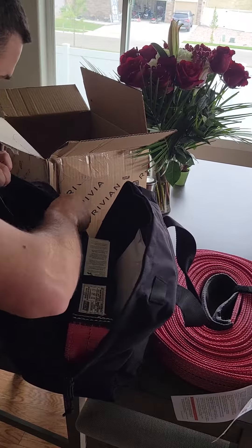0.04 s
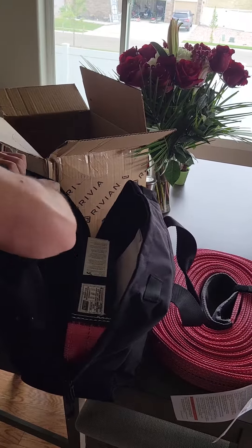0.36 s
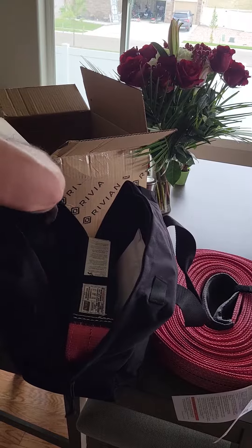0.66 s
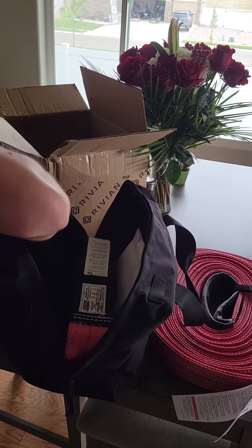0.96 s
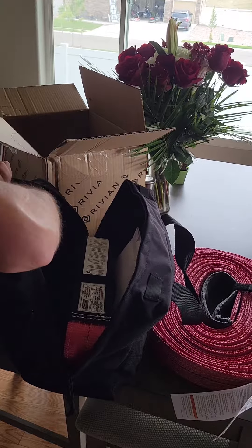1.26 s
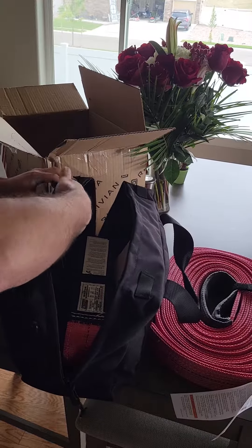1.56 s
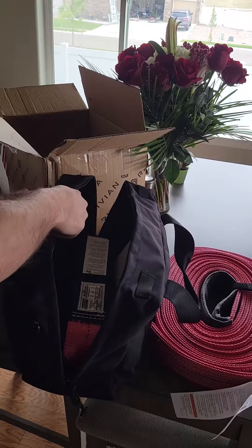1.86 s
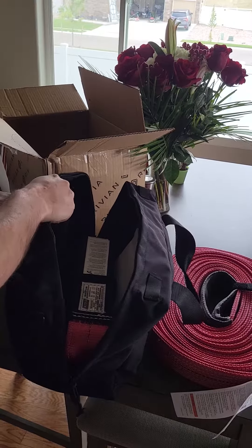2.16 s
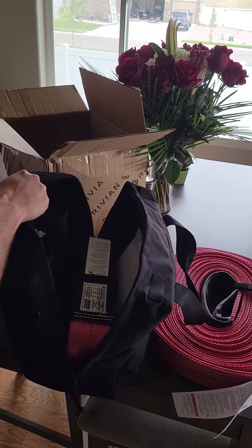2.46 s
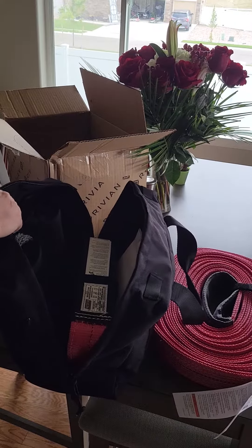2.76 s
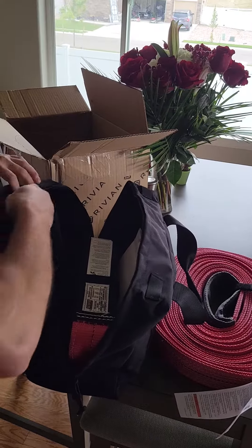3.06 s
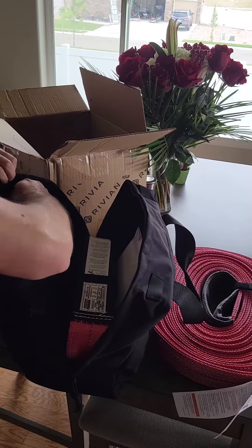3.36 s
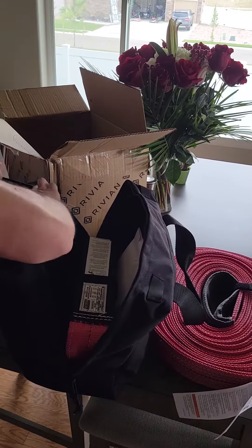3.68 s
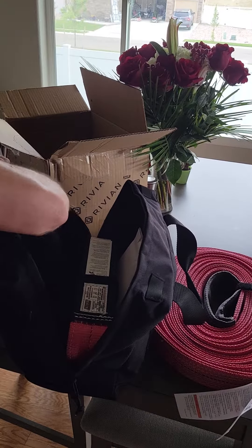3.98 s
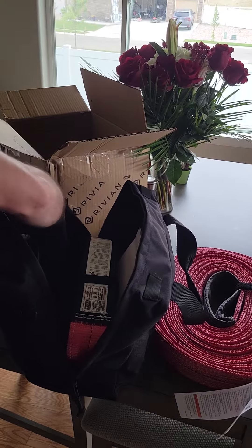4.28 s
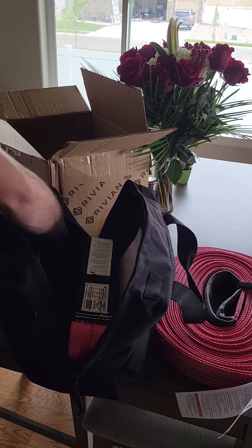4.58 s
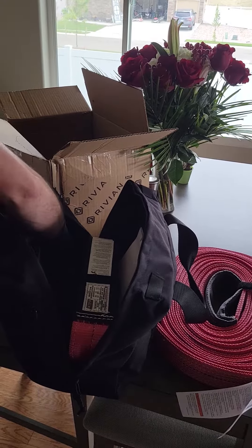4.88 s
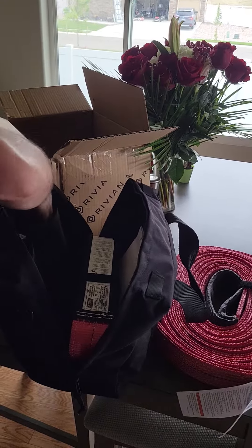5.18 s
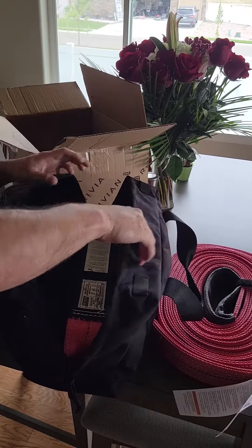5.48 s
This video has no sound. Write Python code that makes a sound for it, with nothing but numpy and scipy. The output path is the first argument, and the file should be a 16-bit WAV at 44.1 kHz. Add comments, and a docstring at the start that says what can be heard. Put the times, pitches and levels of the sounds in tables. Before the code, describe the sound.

Stiff nylon swishes and crumples in a small room as a fitting snaps, a buckle jiggles and a cardboard box gets bumped.

```python
"""A small room, close on a table; a camera's two microphone ports pick up a nylon gear bag and a box.
From the start hands rummage: the weave swishes, stiff folds crumple and drag on the hollow bag, flaps
bump. At 0.65 s a strap fitting snaps; near 1 s come smaller snaps and a jiggling buckle, then ribbed
webbing squeaks. The rummaging gets busier from 2 s, and between 4 and 5 s come the hardest knocks on
the cardboard box. Room air and a faint appliance hum lie under it all."""
import sys
import numpy as np
from scipy import signal
from scipy.fft import rfft, irfft, next_fast_len
from scipy.io import wavfile
from scipy.ndimage import uniform_filter1d, map_coordinates

SR = 44100
rng = np.random.default_rng(int(sys.argv[2]) if len(sys.argv) > 2 else 0)


def materialize(psi):
    """Save the field psi as 16-bit PCM at rate SR to the path in sys.argv[1].

    A 1-D psi becomes a single channel; in a 2-D psi each row is a channel.
    """
    bounded = np.clip(np.atleast_2d(psi).T, -1, 1)
    quanta = np.round(bounded * 32767).astype(np.int16)
    wavfile.write(sys.argv[1], SR, quanta)


N = 243873

# Levels are relative within a table; each source adds its own gain.
# stereo width at the microphone: frequency_hz, side_minus_mid_db
MIC_WIDTH = [(60, -9), (110, -22), (200, -11.5), (380, -2.5), (700, 3), (1290, 3), (2380, -1.5),
             (4400, -0.5), (8120, -0.5), (15000, 0)]
# stereo balance at the microphone: frequency_hz, left_minus_right_db
MIC_BALANCE = [(60, -2.5), (110, 4), (200, -2.5), (380, 2), (700, 1.5), (1290, 0.0), (2380, 0.0), (4400, 1),
               (8120, 2.5), (15000, -6)]
# early reflections off table and walls: delay_s, left_db, right_db
REFLECTIONS = [(.0014, -4.5, -14), (.0021, -21, -32), (.0036, -16, -7), (.0098, -19, -26),
               (.0185, -23, -46), (.0345, -12, -10), (.043, -9, -16)]
# decay of the small room: frequency_hz, t60_s
ROOM_DECAY = [(150, 0.5), (1000, 0.81), (3000, 0.33), (12000, 0.22)]

# spectra: frequency_hz, level_db
AIR_SPECTRUM = [(15, -46), (25, 2), (96, 2.5), (324, 12), (461, -5), (572, -3), (691, -10), (1280, -21),
                (1550, -3.5), (2970, -12.5), (7220, -10), (8970, -36), (10300, -42), (12400, -34),
                (15800, -13)]  # the quiet room
TABLE_SPECTRUM = [(15, -13), (27, -23), (42, -3.5), (70, 7.5), (120, 8.5), (170, 4), (300, -42)]  # the table under the bag
HEAVE_SPECTRUM = [(25, -19), (70, -22), (120, -9.5), (200, 0), (300, -2), (380, -0.5), (600, -33)]  # heavy cloth fluttering
TAP_SPECTRUM = [(200, -35), (500, 0), (900, 1.5), (1300, 1), (1600, -14), (3500, -34), (8000, -35)]  # a dry tap on cardboard
DRAG_SPECTRUM = [(200, -18.5), (340, -2), (460, 0), (600, 3), (720, -1), (880, -1), (1250, -7.5),
                 (1500, -9), (3000, -36.5)]  # cloth dragging on the hollow bag
FOLD_SPECTRUM = [(500, -17), (1000, -6), (1280, 0), (1520, -6), (1900, -1.5), (2300, -6), (2870, -2.5),
                 (4200, -8), (6000, -14.5), (10000, -35.5)]  # stiff folds crumpling
WEAVE_SPECTRUM = [(1180, -20), (2000, -10), (2240, -3), (2480, -2.5), (3300, -1), (4550, -4.5), (4960, -3),
                  (5740, -5), (7010, -1), (7910, -4.5), (9160, -13), (11000, -9), (12500, -1.5),
                  (15000, -5), (15800, -5.5)]  # nylon threads sliding

# hollow resonances of bag and box: pitch_hz, width_hz, level_db
HOLLOW_MODES = [(271.4, 20, -1.5), (329, 67, -9.5), (494, 5.5, -2.5), (550.3, 21.6, 2), (629, 19, -10.5),
                (757, 64, -7), (1000, 24, -8), (1155, 27, -1)]
# modes of the metal buckle: pitch_hz, level_db, t60_s
BUCKLE_MODES = [(1108, 9.5, 0.09), (1130, -8, .13), (1760, -12, 0.12), (2550, -17, .15), (2750, -10, 0.17),
                (4040, -6, .2)]

# the load shifts inside the bag: start_s, length_s, level_db
LOAD_SHIFTS = [(.02, .11, -57), (0.63, 0.043, -48.5), (1.48, 0.086, -53), (2.02, .025, -46.5),
               (2.139, 0.088, -49), (2.28, .05, -55.5), (2.4, .05, -42.5), (2.514, 0.079, -45),
               (2.84, .07, -60), (3.296, 0.19, -57.5), (3.567, 0.092, -53), (3.995, 0.21, -46),
               (4.3, 0.2, -58), (4.72, 0.11, -46), (5.208, .05, -50.5)]
# ribbed webbing squeaks: start_s, length_s, level_db, start_hz, end_hz
WEBBING_SQUEAKS = [(1.372, 0.11, -59, 3980, 3870), (1.407, 0.076, -61, 4440, 4110),
                   (4.123, 0.027, -44.5, 5200, 3860)]
# the buckle jiggles: start_s, level_db
BUCKLE_JIGGLES = [(1.03, -52), (1.059, -48), (1.1, -52), (1.156, -51), (1.24, -60)]
# soft bumps of flaps and contents: start_s, level_db, pitch_hz
SOFT_BUMPS = [(.048, -44.5, 200), (.155, -45, 318), (0.275, -44.5, 210), (.567, -42.5, 241),
              (.838, -46.5, 221), (1.326, -50.5, 200), (1.527, -44, 293), (1.584, -42, 245),
              (1.899, -44, 241), (2.024, -34, 290), (2.063, -41, 305), (2.195, -39.5, 278.4),
              (2.227, -43, 261), (2.459, -43, 267), (2.532, -43, 202), (2.566, -42, 300),
              (2.91, -42.5, 184), (3.124, -49, 205), (3.207, -50.5, 306), (3.646, -42, 340),
              (4.618, -39.5, 287), (4.773, -29.5, 279), (4.806, -35, 278), (4.841, -35.5, 220),
              (5.243, -35.5, 178)]
# knocks against the box: start_s, level_db, bright_edge_db, pitch_hz
BOX_KNOCKS = [(.047, -43.5, 8.5, 594), (.276, -47, -2, 635), (0.717, -41, -2, 550), (2.026, -48, 8, 704),
              (2.57, -46, 9, 650), (2.989, -49, 8, 895), (3.388, -46, 5, 1030), (3.509, -44, 3, 746),
              (3.63, -43.5, 9, 920), (4.116, -30.5, 2.5, 610), (4.358, -29.5, -8, 530),
              (4.387, -40, -2, 540), (4.775, -28.5, 2, 550), (5.2903, -38.5, 4.5, 710),
              (5.301, -38.5, -1, 620)]
# snaps of fittings and taut cloth: start_s, level_db, pitch_hz
FITTING_SNAPS = [(0.6479, -15.5, 2580), (1.0285, -29.5, 2520), (1.032, -37, 1990), (1.0365, -27.5, 2270),
                 (1.042, -36.5, 1300), (1.6216, -45, 1980)]
# hand strokes over the cloth: start_s, length_s, swish_db, crumple_db, drag_db
HAND_STROKES = [(0.0, 0.0091, -56.5, -62.0, -64), (0.008, 0.08, -59, -62, -51),
                (0.11, 0.083, -74, -62.5, -59), (0.288, 0.11, -61.5, -60.5, -58.5),
                (0.508, 0.13, -53.5, -59, -55), (0.646, 0.081, -55.5, -51, -49.5),
                (0.757, 0.081, -51.5, -53.5, -61.5), (0.85, 0.15, -49.0, -53.5, -54.5),
                (0.999, 0.027, -49, -46, -45.5), (1.168, 0.15, -65.0, -76, -62.5),
                (1.389, 0.17, -61.5, -58, -60), (1.607, 0.027, -53.5, -54, -63),
                (1.771, 0.07, -59, -58.5, -73), (2.018, 0.041, -54.5, -47, -42.5),
                (2.181, 0.055, -55.5, -53, -48), (2.302, 0.086, -50, -55.0, -57.0),
                (2.385, 0.068, -53, -45.5, -44.5), (2.469, 0.12, -45.5, -40.5, -46.5),
                (2.597, 0.042, -63, -52, -48.5), (2.7, 0.079, -58.0, -54.5, -61),
                (2.762, 0.09, -44, -43, -51.5), (2.849, 0.082, -44, -51, -56.5),
                (2.975, 0.034, -52.0, -55.5, -53.5), (3.07, 0.14, -58.5, -63, -62.5),
                (3.32, 0.12, -47.5, -54, -56), (3.45, 0.18, -55.5, -57, -53), (3.702, 0.097, -74, -75, -61),
                (3.997, 0.089, -56, -54, -53.5), (4.074, 0.067, -51.0, -43.5, -42),
                (4.202, 0.08, -50.5, -51.5, -50.5), (4.295, 0.095, -52.5, -51.5, -52.5),
                (4.401, 0.096, -51.5, -50, -50.0), (4.553, 0.16, -49, -45.5, -49.5),
                (4.665, 0.13, -48.0, -44, -41), (4.81, 0.041, -56.5, -52, -42.5),
                (4.937, 0.15, -57, -51.5, -45.5), (5.068, 0.149, -42.5, -49, -49.5),
                (5.273, 0.019, -71, -55, -48.5), (5.422, 0.115, -64.5, -59, -69)]

STROKE_SETTLE_DB_PER_S, STROKE_HELD_DB = (129, 106, 108), (-71, -68.5, -66)  # swish, crumple, drag
EASE_IN = 0.73  # how a movement gathers speed: smaller is more abrupt
DRAG_TO_LOAD_DB = -12
TABLE_DB, TABLE_FOLLOWS = -69, 0.66  # usual rumble; its dB per dB of load movement
MIC_TOP_HZ = 15850


def amp(db):
    return 10 ** (np.asarray(db) / 20)


def unit_rms(x):
    return x / np.sqrt(np.mean(x ** 2) + 1e-20)


def along(points, hz):
    """Interpolate (frequency_hz, value) points on a log axis."""
    frequencies, values = np.transpose(points)
    return np.interp(np.log(hz + 1), np.log(frequencies + 1), values)


def wobble(rate):
    """A smooth random curve, rate knots a second."""
    knots = rng.standard_normal(int(N * rate / SR) + 4)
    return map_coordinates(knots, [np.arange(N) * rate / SR])


def filtered(x, response):
    """x times a complex response of frequency."""
    size = next_fast_len(N + SR // 2)
    return irfft(rfft(x, size) * response(np.fft.rfftfreq(size, 1 / SR)), size)[..., :N]


def add(track, start_s, sound):
    """Mix a sound into a track at start_s."""
    part = track[..., max(round(start_s * SR), 0):][..., :sound.shape[-1]]
    part += sound[..., :part.shape[-1]]


def spread(pair):
    """Two unrelated streams become left and right: the bass is alike, the rest wide."""
    def width(hz):
        side_gain = amp(along(MIC_WIDTH, hz))
        return np.array([np.ones_like(hz), side_gain]) / np.hypot(1, side_gain)
    mid, side = filtered(pair, width)
    left_right = np.array([mid + side, mid - side])
    return filtered(left_right, lambda hz: amp(np.outer([.5, -.5], along(MIC_BALANCE, hz))))


def hollow(hz):
    """Summed response of the resonances of bag and box."""
    return sum(amp(db) * 1j * hz * width / (pitch ** 2 - hz ** 2 + 1j * hz * width)
               for pitch, width, db in HOLLOW_MODES)


def coloured(pair, spectrum, ring=0):
    """Stereo sound with the given spectrum and hollow ring, at unit rms in the centre."""
    def response(hz):
        width_makeup = np.hypot(1, amp(along(MIC_WIDTH, hz)))
        return amp(along(spectrum, hz)) * (1 + ring * hollow(hz)) * width_makeup
    sound = spread(filtered(pair, response))
    return sound / np.std(sound.mean(axis=0))


def room_tone():
    """Quiet room air with a faint, unsteady appliance hum."""
    hum = np.sin(2 * np.pi * 116 * np.arange(N) / SR + 0.69 * wobble(9.9))
    air = coloured(rng.standard_normal((2, N)), AIR_SPECTRUM)
    return amp(-66) * air + amp(-71) * hum


def in_room(x, early_db, tail_db):
    """The microphone hears the direct sound, reflections off table and walls, and a diffuse tail."""
    hz, t, noise = signal.stft(rng.standard_normal((2, SR // 2)), SR, nperseg=256)
    decay = amp(-60 * t / along(ROOM_DECAY, hz)[:, None])
    onset = 1 - np.exp(-t / 0.0015)
    tail = signal.istft(noise * decay * onset, SR, nperseg=256)[1]
    response = spread(amp(tail_db) * tail / np.linalg.norm(tail[0]))[:, :SR // 2]
    response[:, 0] += 1  # direct sound
    for delay_s, left_db, right_db in REFLECTIONS:
        add(response, delay_s, amp(early_db + np.array([[left_db], [right_db]])))
    return signal.fftconvolve(x[None], response, axes=1)[:, :N]


def table_rumble(load):
    """The table rumbles faintly under the moving load."""
    gain = amp(TABLE_DB) * (load / np.median(load)) ** TABLE_FOLLOWS
    return gain * coloured(rng.standard_normal((2, N)), TABLE_SPECTRUM)


def slips(per_s, spread_db, smooth_db):
    """Two streams of tiny stick-slip impulses of uneven size over a smooth rub."""
    happens = rng.random((2, N)) < per_s / SR
    sizes = amp(spread_db * np.clip(rng.standard_normal((2, N)), -2, 2))
    grains = happens * sizes * np.sign(rng.standard_normal((2, N)))
    return unit_rms(grains) + amp(smooth_db) * rng.standard_normal((2, N))


def heave(load):
    """The heavy cloth flutters dully as the contents shift."""
    flutter = slips(per_s=130, spread_db=1, smooth_db=-4)
    return load * amp(-4) * coloured(flutter, HEAVE_SPECTRUM, ring=1.73)


def squeaks():
    """Webbing ribs slide over ribs; the thin note sinks as the strap slows."""
    track = np.zeros(N)
    for start_s, length_s, db, start_hz, end_hz in WEBBING_SQUEAKS:
        n = round(length_s * SR)
        hz = np.linspace(start_hz, end_hz, n) * (1 + 0.031 * wobble(432)[:n])
        add(track, start_s, amp(db) * np.hanning(n) * np.sin(2 * np.pi * np.cumsum(hz) / SR))
    return track


def buckle():
    """The metal buckle rings briefly, damped by the cloth around it."""
    track, t = np.zeros(N), np.arange(SR // 3) / SR
    for start_s, db in BUCKLE_JIGGLES:
        for hz, mode_db, t60_s in BUCKLE_MODES:
            struck_db = db - 7 + mode_db + 2 * rng.standard_normal()
            add(track, start_s, amp(struck_db - 60 * t / t60_s) * np.sin(2 * np.pi * hz * t))
    return track


def bumps():
    """A padded contact is a low push that dies within a few cycles."""
    track, t = np.zeros(N), np.arange(SR // 5) / SR
    envelope = (1 - np.exp(-t / 0.0026)) ** 2 * amp(-60 * t / 0.035)
    for start_s, db, hz in SOFT_BUMPS:
        push = envelope * np.sin(2 * np.pi * hz * t)
        add(track, start_s, amp(db - 2.5) * push / np.abs(push).max())
    return track


def knocks():
    """Firmer contacts start with a dry cardboard tap and ring the hollow modes near their own pitch."""
    ring, taps, t = np.zeros(N), np.zeros(N), np.arange(SR // 4) / SR
    mode_hz, width_hz, mode_db = np.transpose(HOLLOW_MODES)[:, :, None]
    modes = np.sin(2 * np.pi * mode_hz * t) * np.exp(-np.pi * width_hz * t)
    for start_s, db, edge_db, pitch_hz in BOX_KNOCKS:
        octaves_away = np.log2(mode_hz / pitch_hz)
        strength = amp(mode_db + 2 * rng.standard_normal(mode_db.shape) - 20 * octaves_away ** 2)
        tone = (strength * modes).sum(axis=0)
        add(ring, start_s, amp(db - 4) * tone / np.abs(tone).max())
        taps[round(start_s * SR)] = amp(db + edge_db + 25)
    return ring + filtered(taps, lambda hz: amp(along(TAP_SPECTRUM, hz)))


def snaps():
    """A hard snap swings for barely two cycles, with a small low thud behind it."""
    track, t = np.zeros(N), np.arange(SR // 20) / SR
    thud = amp(-16.5 - 60 * t / 0.016) * np.sin(2 * np.pi * 520 * t)
    for start_s, db, hz in FITTING_SNAPS:
        crack = np.sin(2 * np.pi * hz * t) * t ** 2 * np.exp(-t / 0.00013)
        add(track, start_s, amp(db + 0.5) * (crack / np.abs(crack).max() + thud))
    return track


def gestures(starts_s, lengths_s, levels_db, settle_db_per_s, held_db):
    """Gain of overlapping movements: each gathers speed over its length, then settles."""
    t, power = np.arange(N) / SR, np.full(N, amp(held_db) ** 2)
    for start_s, length_s, db in zip(starts_s, lengths_s, levels_db):
        speed = np.sin(np.pi / 2 * np.clip((t - start_s) / length_s, 0, 1)) ** EASE_IN
        settled_db = settle_db_per_s * np.maximum(t - start_s - length_s, 0)
        power += (speed * amp(db - settled_db)) ** 2
    return np.sqrt(power)


def handling():
    """How strongly the hands drive weave, folds, hollow bag and load at each moment."""
    starts_s, lengths_s, *levels_db = np.transpose(HAND_STROKES)
    layers = zip(levels_db, STROKE_SETTLE_DB_PER_S, STROKE_HELD_DB)
    swish, crumple, drag = [gestures(starts_s, lengths_s, *layer) for layer in layers]
    shifts = gestures(*np.transpose(LOAD_SHIFTS), settle_db_per_s=93, held_db=-63)
    load = np.hypot(shifts, amp(DRAG_TO_LOAD_DB) * drag)
    return swish, crumple, drag, load


def folding(pair, depth_db):
    """Folds open and close, so patches of the spectrum swell and fade."""
    spectra = signal.stft(pair, nperseg=1024)[2]
    patches = uniform_filter1d(rng.standard_normal(spectra.shape[1:]), size=4, axis=0)  # over frequency
    patches = uniform_filter1d(patches, size=7, axis=1)  # over time
    return signal.istft(spectra * amp(depth_db * unit_rms(patches)), nperseg=1024)[1][:, :N]


def rustle(swish_gain, crumple_gain, drag_gain):
    """Threads slide finely, folds buckle coarsely, and the drag shakes the hollow bag."""
    grip = wobble(50)  # the hand catches and lets go
    threads = folding(slips(per_s=4000, spread_db=2, smooth_db=2), depth_db=2.5)
    folds = folding(slips(per_s=700, spread_db=4, smooth_db=2), depth_db=3.5)
    rubbing = folding(slips(per_s=700, spread_db=3, smooth_db=2), depth_db=2.5)
    swish = swish_gain * amp(-1.5 + 0.5 * grip + 1.1 * wobble(45)) * coloured(threads, WEAVE_SPECTRUM)
    crumple = crumple_gain * amp(-4.5 + 0.21 * grip + 0.6 * wobble(40)) * coloured(folds, FOLD_SPECTRUM)
    drag = drag_gain * amp(-3.5 + 0.76 * grip) * coloured(rubbing, DRAG_SPECTRUM, ring=0.7)
    return swish + crumple + drag


def scene():
    """The cloth is close and dry; the contacts sound in the room, the sharp snaps most of all."""
    swish, crumple, drag, load = handling()
    contacts = in_room(bumps() + knocks() + buckle() + squeaks(), early_db=-11.5, tail_db=-8.5)
    cracks = in_room(snaps(), early_db=-4, tail_db=-4.5)
    cloth = rustle(swish, crumple, drag) + heave(load)
    return cloth + table_rumble(load) + contacts + cracks + room_tone()


def record(dry):
    """The camera's microphone keeps nothing above its band limit."""
    return filtered(dry, lambda hz: hz < MIC_TOP_HZ)


dry = scene()
out = record(dry)
materialize(out)
```